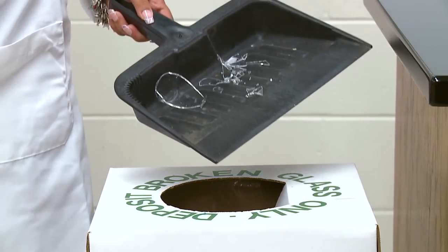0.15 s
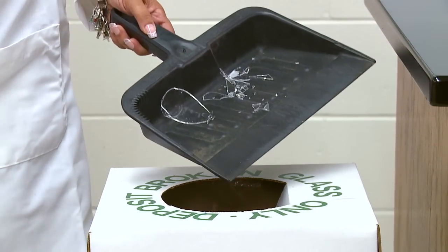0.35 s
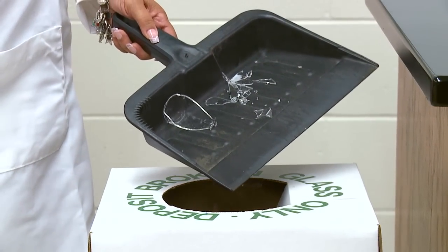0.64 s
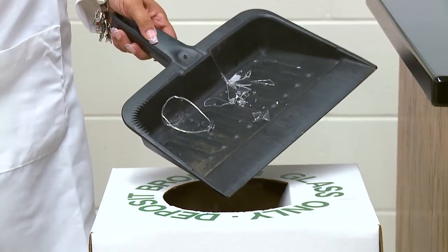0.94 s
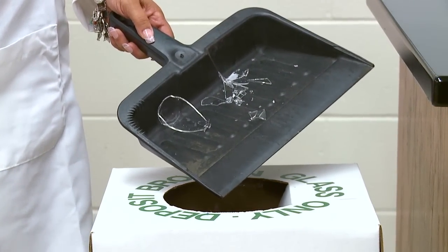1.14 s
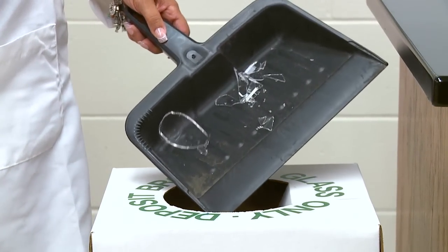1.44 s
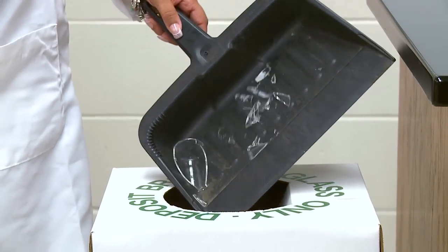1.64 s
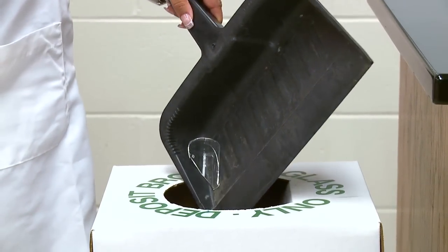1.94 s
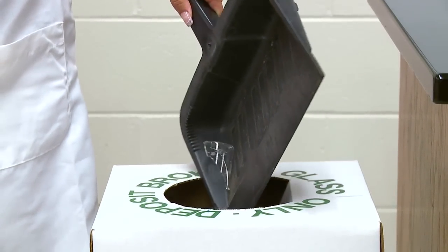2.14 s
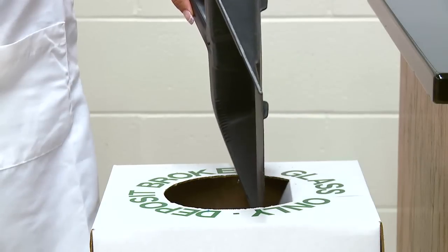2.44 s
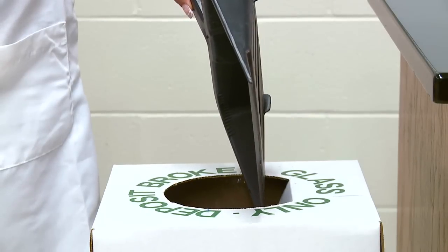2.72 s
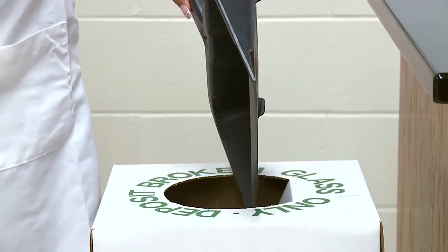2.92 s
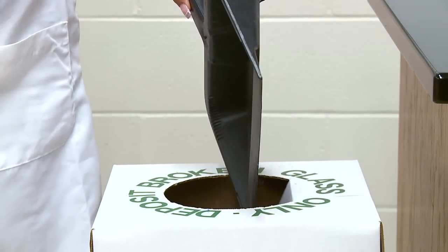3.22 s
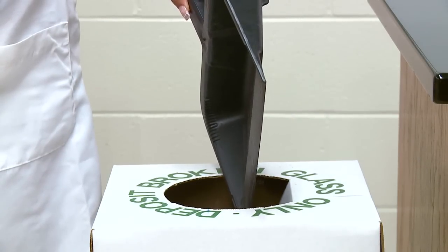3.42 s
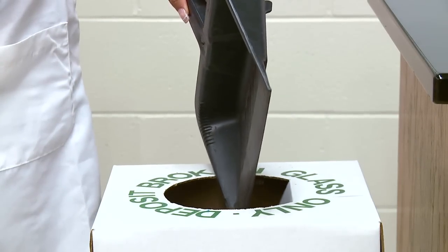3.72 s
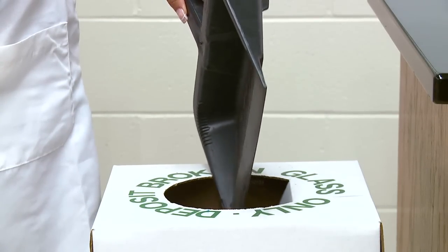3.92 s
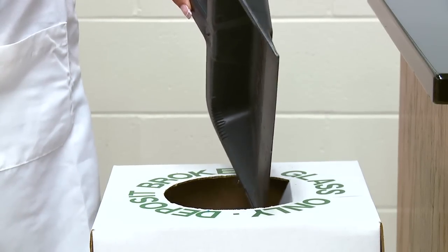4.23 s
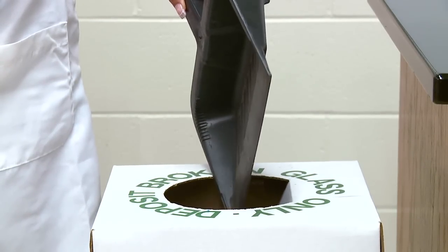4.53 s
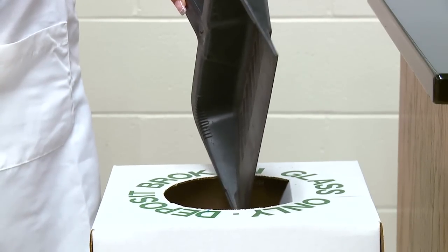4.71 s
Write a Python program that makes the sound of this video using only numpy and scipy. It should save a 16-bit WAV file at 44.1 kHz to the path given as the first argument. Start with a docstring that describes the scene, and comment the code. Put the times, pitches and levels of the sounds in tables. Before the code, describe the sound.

Broken glass scrapes and clinks down a plastic dustpan, thuds and clashes into a cardboard box, then the pan is shaken with dry clacks.

```python
"""Ventilation rumbles in a small hard-walled room while glass shifts with faint scratches on a plastic dustpan.
A broken wine glass slides off into a cardboard box: bowl, shards and foot clink, then thud and clash in the box.
The pan is shaken with dry clacks, small metal charms jingle on the wrist and the sleeve rustles.
Struck glass, metal, pan and box are damped modes with noise bursts; scraping and cloth are random tiny impacts.
Air is coloured noise with slow puffs; all but the air gets the tail of the room."""
import sys
import numpy as np
from scipy import signal
from scipy.fft import rfft, irfft
from scipy.io import wavfile

SR = 44100
rng = np.random.default_rng(int(sys.argv[2]) if len(sys.argv) > 2 else 0)


def master(y):
    """Save y as 16-bit WAV."""
    cut = np.clip(np.atleast_2d(y).T, -1, 1)
    pcm = np.round(cut * 32767)  # scale
    wavfile.write(sys.argv[1], SR, pcm.astype(np.int16))


N = 214590
T = np.arange(N) / SR
AGE = T[:SR // 2]  # time since a blow, half a second long

# edges of the five bands that shape knocks and clacks: [Hz]
BLOW_EDGES_HZ = [100, 350, 800, 2000, 6000, 16000]
BLOW_PIVOT_HZ = 530
# clacks of the shaken pan: (time [s], level before gain [dB], brightness [dB/octave], contact time [s])
PAN_CLACKS = [(3.695, -28.5, 1, 0.0089), (3.876, -30.5, 0.5, 0.0086), (4.059, -28.5, 0, 0.015),
              (4.258, -28.5, 0.7, 0.0064), (4.463, -26.5, 0.08, 0.0092), (4.661, -25, 0, 0.0078),
              (4.860, -19.5, -1.24, 0.0018)]
ARM_STIRS_S, WIND_UP_DB = 3.56, -6  # the arm starts to move, softly until the first shake


def amp(db):
    """Decibels to gain."""
    return 10 ** (np.asarray(db) / 20)


def unit(x):
    """Scale to rms 1."""
    return x / np.sqrt(np.mean(x ** 2))


def add(out, s, sound):
    """Mix a sound in at time s."""
    i = max(int(s * SR), 0)
    out[i:i + len(sound)] += sound[:max(N - i, 0)]


def band(x, lo_hz, hi_hz, order=3):
    """Causal band-pass."""
    edges = [lo_hz, min(hi_hz, SR / 2 - 100)]
    return signal.sosfilt(signal.butter(order, edges, "band", fs=SR, output="sos"), x)


def colour(x, points):
    """Shape a sound by a (Hz, dB) spectrum, straight in log frequency between points."""
    hz, db = np.transpose(points)
    f = np.maximum(np.fft.rfftfreq(len(x), 1 / SR), 1)
    gain = amp(np.interp(np.log(f), np.log(hz), db))
    return irfft(rfft(x) * gain, len(x))


def fade(t60):
    """Exponential decay after a blow, down 60 dB after t60 seconds."""
    return np.exp(-np.log(1000) * AGE / t60)


def hiss(t60):
    """A dying burst of noise."""
    return rng.standard_normal(len(AGE)) * fade(t60)


def ring(modes, scatter_db, detune):
    """Damped modes; each blow lands elsewhere, so weights and pitches scatter."""
    out = np.zeros(len(AGE))
    for hz, db, t60 in modes:
        weight_chance, pitch_chance = rng.standard_normal(2)
        mode_hz = hz * (1 + detune * pitch_chance)
        out += amp(db + scatter_db * weight_chance) * fade(t60) * np.sin(2 * np.pi * mode_hz * AGE)
    return out


def weigh(x, edges_hz, band_db, size=660):
    """Give the first 15 ms of a blow (size samples) its rms level in each band."""
    out = np.zeros(len(x))
    for lo, hi, db in zip(edges_hz, edges_hz[1:], band_db):
        part = band(x, lo, hi)
        out += part * amp(db) / np.sqrt(np.mean(part[:size] ** 2))
    return out


def octaves(edges_hz, pivot_hz):
    """Distance of each band's centre above a pivot, in octaves."""
    edges = np.array(edges_hz, float)
    return np.log2(np.sqrt(edges[:-1] * edges[1:]) / pivot_hz)


def grains(per_s, spread_db):
    """Random tiny impacts, most weak and a few strong."""
    size = amp(spread_db * np.minimum(rng.exponential(size=N), 4))
    return (rng.random(N) < per_s / SR) * size * rng.choice([-1, 1], N)


def tinkles(start, end, lo_hz, hi_hz, t60, spread_db, count):
    """Many tiny parts, each pinging once at a pitch of its own."""
    out, age = np.zeros(N), AGE[:SR // 16]
    decay = fade(t60)[:len(age)]
    for when, pitch, strength in rng.random((count, 3)):
        hz = lo_hz * (hi_hz / lo_hz) ** pitch
        size = amp(-spread_db * np.log(max(strength, .04)))
        add(out, start + when * (end - start), size * decay * np.sin(2 * np.pi * hz * age))
    return unit(out) * np.sqrt((end - start) / T[-1])


def rebounds(chatter_db):
    """A first contact followed by a dying scatter of tiny rebounds."""
    contacts = amp(chatter_db) * (rng.random(len(AGE)) < 600 / SR) * hiss(.07)
    contacts[0] = 1
    return contacts


def ventilation(whistle_db):
    """Duct rumble with wavering fan and mains lines and a faint high whistle of air."""
    # spectrum of the duct air: (frequency [Hz], relative level [dB])
    duct_spectrum = [(11, -18.5), (18, 4), (42, -3.5), (81, -13), (108, -17), (160, -14.5), (291, -22.5),
                     (326, -20), (500, -32.5), (683, -29), (834, -38), (3080, -54), (3980, -47),
                     (5140, -55), (16000, -58)]
    # fan and mains lines: (frequency [Hz], rms level [dB])
    hum_lines = [(30.4, -52), (120, -55.5), (157, -60.5)]
    air = amp(-41.5) * unit(colour(rng.standard_normal(N), duct_spectrum))
    hum = np.zeros(N)
    for hz, db in hum_lines:
        drift = np.cumsum(rng.standard_normal(N)) / np.sqrt(SR)  # the phase wanders
        hum += np.sqrt(2) * amp(db) * np.sin(2 * np.pi * hz * T + 1.35 * drift)
    whistle = unit(band(rng.standard_normal(N), 3800, 4400, order=1))
    return air + hum + amp(whistle_db) * whistle


def creep(scratch_db, splinter_db, surge_db):
    """While the pan is lowered the glass shifts in small jerks: faint scratches and tinkles."""
    start_s, end_s, ramp_s = 0.028, .47, 0.04
    settled_s = 0.19  # by now the smallest splinters have stopped stirring
    moving = np.clip(np.minimum(T - start_s, end_s - T) / ramp_s, 0, 1)
    surges = amp(surge_db * unit(band(rng.standard_normal(N), 4.1, 33, order=2)))
    scratch = unit(surges * band(grains(per_s=2900, spread_db=3.5), 430, 2730, order=2))
    splinters = tinkles(start_s, settled_s, 6800, 14500, t60=0.022, spread_db=1, count=40)
    return moving * (amp(scratch_db) * scratch + amp(splinter_db) * splinters)


def ticks(gain_db, t60):
    """Splinters too small to ring tick on the pan as short noise bursts."""
    # splinter ticks: (time [s], peak before gain [dB])
    tick_times = [(0.0967, -42), (0.165, -37), (0.2563, -42), (0.412, -32.5), (0.767, -45), (1.65, -23),
                  (1.7753, -15.5), (2.018, -16), (2.4037, -27.5), (2.559, -23)]
    out = np.zeros(N)
    for s, db in tick_times:
        tick = band(hiss(t60), 920, 15130, order=1)
        add(out, s, amp(db + gain_db) * tick / np.abs(tick).max())
    return out


def clinks(table, modes, tone_db, gain_db, crack_db, crack_t60, chatter_db):
    """Glass on glass: a hard crack and tiny rebounds, then a ring cut short by whatever the piece lies on."""
    # edges of the four glass bands: [Hz]
    glass_edges_hz = [2500, 6500, 8500, 12000, 16000]
    tilt = octaves(glass_edges_hz, pivot_hz=8500)
    out = np.zeros(N)
    for s, level_db, brightness, freedom in table:
        damped = [(hz, db, t60 * freedom) for hz, db, t60 in modes]
        tone = signal.fftconvolve(rebounds(chatter_db), ring(damped, 1, .001))[:len(AGE)]
        crack = amp(crack_db) * hiss(crack_t60)
        band_db = level_db + np.array(tone_db) + brightness * tilt
        add(out, s, weigh(tone + crack, glass_edges_hz, band_db))
    return amp(gain_db) * out


def bowl_clinks():
    """The curved piece of the bowl strikes other glass and rings in its own modes."""
    # blows: (time [s], level before gain [dB], brightness [dB/octave], ring length against free ringing [0-1])
    blow_times = [(0.4284, -35, 8, 0.25), (1.4022, -51, 0, 0.3), (1.5264, -33.5, -2, .46),
                  (1.5713, -38, 1.5, 0.9), (1.6192, -31.5, 2.5, 0.72), (1.839, -26, -3.5, .5)]
    # modes ringing freely: (frequency [Hz], level [dB], t60 [s])
    modes = [(3084, -14, .2), (3520, -14, .2), (7275, -6, .42), (8000, -1, .3), (9175, -3, .25),
             (9690, -9, .2), (10530, 1, .33), (12490, -7, .18), (14220, -11, .2), (14630, -4, .18)]
    # tone when struck, in the four glass bands: [dB]
    tone_db = [-8.5, 1, 1, -10]
    return clinks(blow_times, modes, tone_db, gain_db=-4.0, crack_db=-3.5, crack_t60=0.025, chatter_db=-35.5)


def wafts(sway_hz, t60, flutter_db, shake_db):
    """Slow dying swings of air pressure with a little turbulence, from pan jolts, box drops and every shake."""
    # puffs as the pan jolts and glass drops into the box: (time [s], level [dB])
    puffs = [(0.43, -31), (2.193, -21.5), (2.261, -27.5), (2.556, -21.5), (2.674, -18.5), (2.808, -28)]
    out = np.zeros(N)
    for s, db in puffs + [(s, shake_db) for s, *_ in PAN_CLACKS]:
        flutter = amp(flutter_db) * unit(band(rng.standard_normal(len(AGE)), 45, 195, order=2))
        add(out, s, amp(db) * fade(t60) * (np.sin(2 * np.pi * sway_hz * AGE) + flutter))
    return out


def slide(body_db, grit_db, splinter_db, treble_power, surge_db, dull_hz):
    """Edges catch and slip on plastic: clicks drum the pan in surges, brighter and grittier with harder scraping."""
    # how hard the glass scrapes down the tipping pan: (time [s], level before gain [dB])
    scrape_curve = [(1.378, -61.5), (1.524, -49), (1.55, -38.5), (1.72, -37.5), (1.85, -35), (2.03, -42.5),
                    (2.29, -49), (2.49, -45.5), (2.642, -64)]
    # spectrum of the scraped pan: (frequency [Hz], relative level [dB])
    pan_spectrum = [(150, -37.5), (330, -7), (480, 4), (680, 5.5), (900, -1), (1500, 0), (2200, -5),
                    (3300, -6), (5000, -13), (7000, -24), (15000, -36)]
    s, scrape_db = np.transpose(scrape_curve)
    scrape = amp(np.interp(T, s, scrape_db)) * (T > s[0]) * (T < s[-1])
    force = scrape / scrape.max()
    surges = amp(surge_db * unit(band(rng.standard_normal(N), 36, 56, order=2)))
    slips = grains(per_s=700, spread_db=3.0)
    clicks = signal.fftconvolve(slips, hiss(0.013))[:N] + grains(per_s=6600, spread_db=6)
    pan = unit(surges * colour(clicks, pan_spectrum))
    drum = band(pan, 60, dull_hz, order=1)
    body = drum + (pan - drum) * np.sqrt(force)
    grit = band(slips + grains(per_s=880, spread_db=5.5), 4100, 14000, order=2)
    splinters = tinkles(s[0], s[-1], 5000, 15500, t60=0.025, spread_db=3, count=700)
    treble = amp(grit_db) * unit(grit * surges) + amp(splinter_db) * splinters * np.sqrt(force)
    return amp(body_db) * scrape * body + treble * force ** treble_power


def knocks(gain_db, rattle_db, rattle_t60, panel_db, tail_db, tail_t60, hollow_db, hollow_t60):
    """Heavy pieces thump the hollow pan and box, which rattle and settle; soft landings lack treble."""
    # glass on pan and box: (time [s], level before gain [dB], hardness as treble [dB/octave], boom of the box [dB])
    thumps = [(1.584, -19.5, -2, -7), (1.665, -33.5, -2, 3), (1.743, -26.5, 1, -13), (1.818, -36.5, 6.5, 3),
              (1.848, -25.5, 3, 2), (1.941, -28.5, 3.5, 0), (1.983, -7, -12.5, -2.5), (2.03, -29, -1, 2),
              (2.056, -20, -12, 9.5), (2.138, -27.5, -3.5, 8), (2.202, -24, -8.5, 3), (2.34, -24, -1, 10),
              (2.477, -32.5, -11.5, 1.5), (2.555, -11, -16, 10.5), (2.668, -15, -2, 2.5),
              (2.70, -22.5, -28, 12.5)]
    # modes of the box: (frequency [Hz], level [dB], t60 [s])
    box_modes = [(134, -10, 0.078), (249, -11.5, 0.09), (340, -8, 0.13), (454, -13, 0.077),
                 (485, 2.5, 0.055), (661, 0, 0.047), (930, -11.5, 0.12), (1120, -17, 0.01),
                 (1640, -3.5, 0.047)]
    # tone when struck, in the five blow bands: [dB]
    tone_db = [-16.5, -1, -2, -8, -19.5]
    treble_octaves = np.maximum(octaves(BLOW_EDGES_HZ, BLOW_PIVOT_HZ), 0)
    out = np.zeros(N)
    for s, level_db, hardness, boom_db in thumps:
        shake = hiss(rattle_t60) + amp(tail_db) * hiss(tail_t60)
        rattle = shake + amp(panel_db) * band(shake, 490, 1194, order=1)
        hollow = amp(hollow_db + boom_db) * band(hiss(hollow_t60), 170, 420, order=2)
        body = ring(box_modes, 2, .02)
        band_db = level_db + np.array(tone_db) + hardness * treble_octaves
        band_db[0] += boom_db
        blow = body + hollow + amp(rattle_db) * rattle
        add(out, s + 0.001073, weigh(blow, BLOW_EDGES_HZ, band_db))
    return amp(gain_db) * out


def shards(gain_db, crack_db, crack_t60, wobble_db, chatter_db):
    """Each shard pings and skitters, and its ring flutters as it spins and brushes the pan."""
    # shards tumbling down the pan: (time [s], shard [name], level before gain [dB])
    tumbles = [(1.71, "sliver", -30.5), (1.7348, "chip", -22), (1.753, "needle", -36.5),
               (1.785, "wedge", -30.5), (1.801, "sliver", -27), (1.830, "flake", -23),
               (1.836, "plate", -38.5), (1.843, "needle", -25), (1.859, "needle", -19.5),
               (1.923, "wedge", -23.5), (1.929, "sliver", -30.5), (1.941, "flake", -33)]
    # modes of the small flat shards, by name: (frequency [Hz], level [dB], t60 [s])
    shard_modes = {"wedge": [(7820, 0, .22), (11350, -7, .2)], "flake": [(9490, 0, .26), (14517, -6, .13),
                   (15490, -5, .22), (15715, -10, .18)], "chip": [(9672, 0, .15), (11370, -11, .13)],
                   "sliver": [(9860, 0, .22), (15490, -9, .2), (15715, -7, .2)], "needle": [(11362, 0, .15),
                   (14517, -4, .12)], "plate": [(3461, -7, .3), (5073, 0, .3)]}
    out = np.zeros(N)
    for s, shard, level_db in tumbles:
        ping = amp(crack_db) * band(hiss(crack_t60), 4000, 14000, order=1)
        for mode in shard_modes[shard]:
            flutter = amp(wobble_db * unit(band(rng.standard_normal(len(AGE)), 30, 160, order=2)))
            ping = ping + flutter * ring([mode], 0, .001)
        add(out, s, amp(level_db) * signal.fftconvolve(rebounds(chatter_db), ping))
    return amp(gain_db) * out


def foot_clinks():
    """The foot of the glass slips over the lip of the pan, with a longer crack and more chatter."""
    # blows: (time [s], level before gain [dB], brightness [dB/octave], ring length against free ringing [0-1])
    blow_times = [(2.1939, -24.5, -1.5, 0.25), (2.2024, -22, 5.5, 0.49), (2.2645, -25, -0.5, 0.67),
                  (2.3342, -30.5, 1, 0.51)]
    # modes ringing freely: (frequency [Hz], level [dB], t60 [s])
    modes = [(3110, -4, .22), (4491, -10, .2), (5349, -6, .2), (6790, -7, .18), (7816, 0, .15),
             (7957, -3, .25), (9490, -10, .2), (9715, 0, .14), (11096, -7, .15), (13015, -2, .12),
             (14560, -11, .12), (15425, -6, .2)]
    # tone when struck, in the four glass bands: [dB]
    tone_db = [-10, -3.5, -3.5, -12.5]
    return clinks(blow_times, modes, tone_db, gain_db=-4, crack_db=-3, crack_t60=0.16, chatter_db=-4)


def drop(t60):
    """Clear of the pan, the bowl's low mode rings freely through the fall until it lands."""
    # the fall: (leaving [s], landing [s], frequency [Hz], level [dB])
    fall = (2.415, 2.556, 3490, -47)
    leave, land, hz, db = fall
    out = np.zeros(N)
    gate = np.clip(np.minimum(AGE, land - leave - AGE) / .006, 0, 1)  # 6 ms ramps
    add(out, leave, amp(db) * gate * fade(t60) * np.sin(2 * np.pi * hz * AGE))
    return out


def heap_clinks():
    """Pieces clash at the bottom of the box with strong cracks."""
    # blows: (time [s], level before gain [dB], brightness [dB/octave], ring length against free ringing [0-1])
    blow_times = [(2.6698, -27, -1.5, 0.12), (2.6944, -36.5, -3, 0.35), (2.7187, -22.5, 0, 0.29),
                  (2.7487, -20.5, -2, 0.39), (2.8054, -37, 3, 0.3)]
    # modes ringing freely: (frequency [Hz], level [dB], t60 [s])
    modes = [(2927, -7, .55), (3110, -11, .2), (3472, -6, .55), (4457, -16, .16), (5491, -13, .2),
             (6772, 0, .17), (7238, -3, .26), (7955, -5, .2), (9160, 0, .24), (9712, -7, .22),
             (10440, -5, .2), (11108, -8, .28), (11428, -7, .15), (13050, -11, .18), (14550, -4, .16),
             (15490, -8, .16)]
    # tone when struck, in the four glass bands: [dB]
    tone_db = [-7, -2.5, -3.5, -10]
    return clinks(blow_times, modes, tone_db, gain_db=-2.0, crack_db=10.5, crack_t60=0.03, chatter_db=4)


def sleeve(jerk_db, steady_db):
    """Cloth rustles softly while the arm moves and swells with each shake."""
    rise_s, fall_s = 0.0066, 0.02
    jerks = sum(np.exp(-np.maximum((s - T) / rise_s, (T - s) / fall_s)) for s, *_ in PAN_CLACKS)
    moving = (T > ARM_STIRS_S) * amp(WIND_UP_DB * (T < PAN_CLACKS[0][0]))
    cloth = unit(band(grains(per_s=1100, spread_db=5.5), 1250, 12800, order=2))
    return cloth * moving * (amp(steady_db) + amp(jerk_db) * jerks)


def charm(click_db):
    """One very brief ping of a small metal charm, peak 1."""
    # modes of a charm: (frequency [Hz], level [dB], t60 [s])
    metal_modes = [(7600, -30, 0.055), (10100, -15, 0.015), (10360, 6, 0.015), (9330, -7, 0.0082),
                   (11300, -25, 0.0093), (12700, -14, .015)]
    click = amp(click_db) * band(hiss(.01), 4000, 13500, order=1)
    ping = ring(metal_modes, 4, .028) + click
    return ping / np.abs(ping).max()


def bracelet(charm_db, chain_db, swing_db, click_db):
    """Charms strike and rebound; chain links patter most as the wrist swings back, more as shaking goes on."""
    # the loudest strikes of charm on charm: (time [s], peak before gain [dB])
    charm_strikes = [(3.7853, -22), (3.7994, -17.5), (3.813, -23), (3.9564, -28), (3.9987, -19),
                     (4.2026, -21), (4.2155, -22), (4.241, -22), (4.246, -21), (4.314, -16.5), (4.354, -22),
                     (4.378, -13), (4.4033, -20), (4.4447, -17.5), (4.563, -24), (4.606, -27), (4.748, -21),
                     (4.7735, -26), (4.8042, -12.5)]
    rebound_s, rebound_loss_db = .009, -8.5  # spacing before scatter, and level step per bounce
    lag_s, spread_s = 0.11, 0.034  # the bracelet swings back this long after each clack
    build_db_per_s = 12.5  # the chain swings more as the shaking goes on
    strikes = np.zeros(N)
    for s, db in charm_strikes:
        for bounce, late in enumerate(rng.uniform(-.4, .4, size=3)):  # the strike and two rebounds
            strike_s = s + bounce * rebound_s * (1 + late)
            add(strikes, strike_s, amp(db + charm_db + bounce * rebound_loss_db) * charm(click_db))
    links = tinkles(ARM_STIRS_S, T[-1], 9970, 9670, t60=0.011, spread_db=13.5, count=260)
    links += 0.69 * tinkles(ARM_STIRS_S, T[-1], 6700, 12800, t60=0.0016, spread_db=3, count=800)
    swings = sum(np.exp(-((T - s - lag_s) / spread_s) ** 2) for s, *_ in PAN_CLACKS)
    shaking_s = T - PAN_CLACKS[0][0]
    effort = amp(build_db_per_s * shaking_s + WIND_UP_DB * (shaking_s < 0))
    return strikes + effort * links * (amp(chain_db) + amp(swing_db) * swings)


def clacks(gain_db, tail_db, tail_t60, echo, rise_s):
    """Each shake ends in a few ms of chatter; a bounce between the pan's walls hollows it."""
    # spectrum of the chatter: (frequency [Hz], relative level [dB])
    chatter_spectrum = [(100, 30), (9000, 1.5), (11000, -6.5), (16000, -16)]
    # tone of a clack, in the five blow bands: [dB]
    tone_db = [-16.5, -2.5, -0.5, 1.5, -2]
    # the plastic pan after a clack: (frequency [Hz], level [dB], t60 [s])
    plastic_modes = [(333.4, -2, 0.096), (590, -2, 0.036)]
    tilt = octaves(BLOW_EDGES_HZ, BLOW_PIVOT_HZ)
    out = np.zeros(N)
    for s, level_db, brightness, contact in PAN_CLACKS:
        rise = np.minimum(AGE / rise_s, 1) ** 2
        chatter = rise * (np.exp(-(AGE / contact) ** 2) + amp(tail_db) * fade(tail_t60))
        sound = chatter * colour(rng.standard_normal(len(AGE)), chatter_spectrum)
        lag = int(SR * rng.uniform(0.0031, 0.0033))
        sound[lag:] += echo * sound[:-lag]
        band_db = level_db + np.array(tone_db) + brightness * tilt
        add(out, s - .001, weigh(sound, BLOW_EDGES_HZ, band_db))
        add(out, s + rise_s, amp(level_db) * ring(plastic_modes, 2, .03))
    return amp(gain_db) * out


def room(x, wet_db):
    """Block walls return a short diffuse tail, each band of noise dying at its own rate."""
    # bands of the tail: (centre [Hz], t60 [s], relative level [dB])
    tail_bands = [(138, 1, -6), (457, 0.61, -2), (1020, 0.39, 3.5), (2760, 0.84, -4.5), (5660, 0.25, -0.5),
                  (12000, 0.61, -1)]
    tail = np.zeros(len(AGE))
    for hz, t60, db in tail_bands:
        tail += amp(db) * band(rng.standard_normal(len(AGE)), hz / 1.25, hz * 2.0, order=2) * fade(t60)
    tail *= np.minimum(AGE / 0.0018, 1)
    tail /= np.sqrt(np.sum(tail ** 2))
    return x + amp(wet_db) * signal.fftconvolve(x, tail)[:N]


def scene():
    """All sources in the room; the moving air reaches the microphone without the room's tail."""
    air = ventilation(whistle_db=-84.5) + wafts(sway_hz=30.2, t60=0.18, flutter_db=-8.5, shake_db=-27.5)
    # the small sounds: splinters, scraping, sleeve and bracelet
    small = creep(scratch_db=-57, splinter_db=-66, surge_db=4.5) + ticks(gain_db=-3, t60=0.016)
    small += slide(body_db=1, grit_db=-58, splinter_db=-46.5, treble_power=0.51, surge_db=3.5, dull_hz=900)
    small += sleeve(jerk_db=-42, steady_db=-57.5)
    small += bracelet(charm_db=-2.5, chain_db=-63.5, swing_db=-56.5, click_db=-6.0)
    glass = bowl_clinks() + foot_clinks() + drop(t60=0.91) + heap_clinks()
    glass += shards(gain_db=-1, crack_db=-3, crack_t60=0.024, wobble_db=3.0, chatter_db=-15)
    blows = knocks(gain_db=-6.0, rattle_db=-6, rattle_t60=0.05, panel_db=16, tail_db=-15.5, tail_t60=0.52,
                   hollow_db=-1.5, hollow_t60=.2)
    blows += clacks(gain_db=-2.5, tail_db=-7.5, tail_t60=0.13, echo=0.32, rise_s=0.0034)
    return (room(glass + blows + small, wet_db=-13) + air)[None]


def record(dry):
    """The recorder cuts the top steeply above 16.2 kHz."""
    return signal.sosfilt(signal.ellip(10, .2, 80, 16200, fs=SR, output="sos"), dry)


dry = scene()
out = record(dry)
master(out)
```